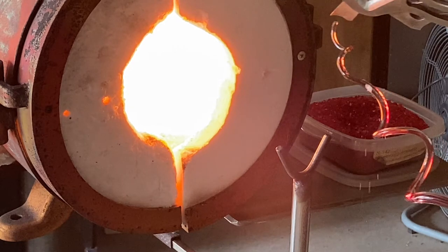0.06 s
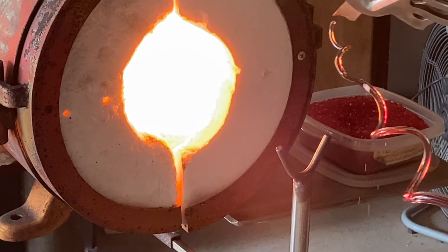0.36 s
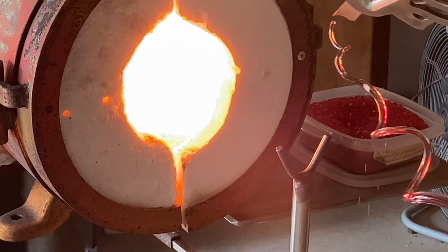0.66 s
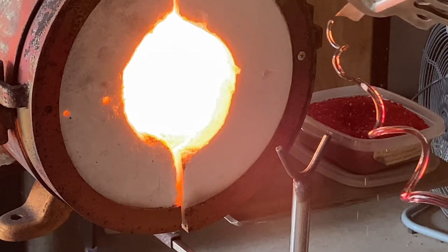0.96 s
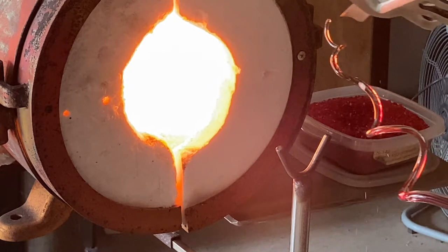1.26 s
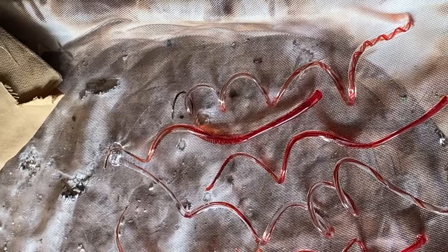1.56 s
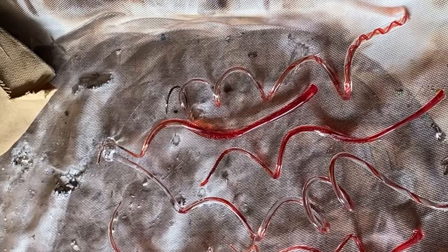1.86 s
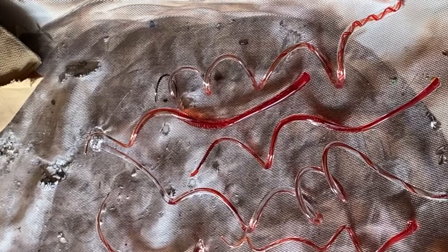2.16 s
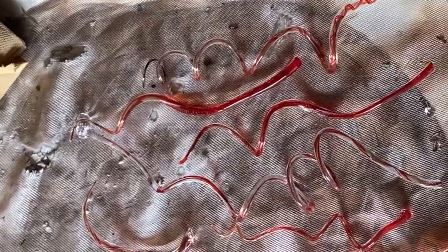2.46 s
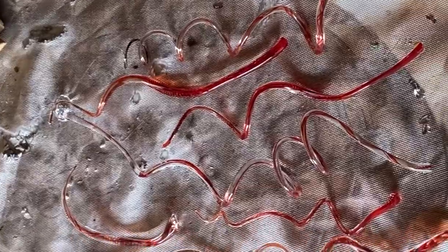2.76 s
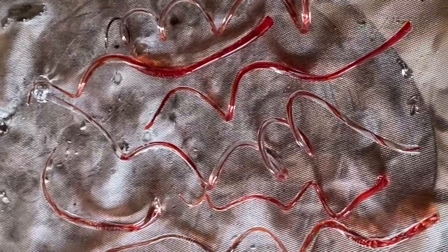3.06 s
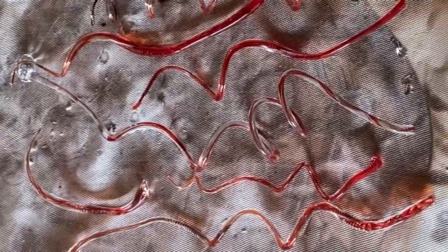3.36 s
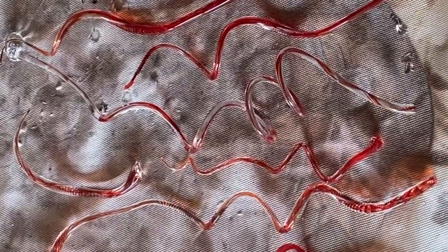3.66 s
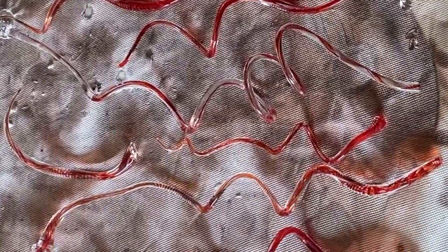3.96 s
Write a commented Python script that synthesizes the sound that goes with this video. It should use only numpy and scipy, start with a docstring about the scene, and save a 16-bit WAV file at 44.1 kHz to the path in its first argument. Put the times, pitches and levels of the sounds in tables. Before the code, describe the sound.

A glass furnace roars low, then gives way to steady rushing air and humming fans.

```python
"""Glass furnace and workshop

At the open port of a glass furnace the flame roars: a dull, fluttering rumble with a few ringing
resonances. After a cut we stand in the workshop, in a fuller, steady noise: rushing air, and the hum
of what are probably two fans, one near and one farther off, turning at slightly different speeds."""
import sys
import numpy as np
from scipy import signal
from scipy.fft import rfft, irfft
from scipy.io import wavfile

SR = 44100
rng = np.random.default_rng(int(sys.argv[2]) if len(sys.argv) > 2 else 0)


def pcm_store(signal):
    """Save signal as 16-bit PCM."""
    levels = np.round(np.clip(np.atleast_2d(signal), -1, 1) * 32767)
    wavfile.write(sys.argv[1], SR, levels.astype(np.int16).T)


N = 176400
TIME = np.arange(N) / SR
HZ = np.maximum(np.arange(N // 2 + 1) * SR / N, 1)

# The flame's roar at the port. Each row: frequency in Hz, noise density in dB.
ROAR_SPECTRUM = [(10, -46.5), (18, -44.5), (35, -45.5), (55, -49), (85, -57), (135, -56.5), (170, -63.5),
                 (210, -66.5), (255, -67.5), (290, -72.5), (500, -77.5), (640, -77), (750, -80),
                 (880, -81.5), (980, -78.5), (1100, -83), (1280, -81.5), (1420, -86)]
# The roar across the microphones. Each row: frequency in Hz, likeness 0-1, left phase lead in radians.
ROAR_IMAGE = [(29.6, 1, 0.28), (75, .78, 0.18), (125, 0.8, 0.9), (189, .98, .1), (300, .999, 0.0064)]
# Resonances of the furnace chamber. Each row: pitch in Hz, half width in Hz, rms level in dB.
CHAMBER_RESONANCES = [(130.6, 6.1, -46.5), (312.2, 7, -57.5), (546.5, 6, -62), (803.5, 9, -56.5)]
# Swell of the deepest rumble. Each row: time in seconds, gain in dB.
RUMBLE_SWELL = [(0, 4), (.25, 1), (.41, 4.5), (.55, 2), (.9, -3.5), (1.2, -2.5), (1.32, 2), (1.42, 8),
                (1.47, 0)]
# Puffs of the flame. Each row: time of the peak in seconds, lift in dB.
FLAME_PUFFS = [(.665, 5.5), (.77, 4.5), (.838, 4.8), (1.018, 3.5), (1.145, 5), (1.305, 5.5), (1.345, 4)]

# Rushing air in the workshop. Each row: frequency in Hz, noise density in dB.
AIR_SPECTRUM = [(20, -86), (32, -76), (45, -62.5), (75, -61), (113, -54.8), (155, -57.5), (172, -61.5),
                (215, -64.5), (268, -62), (310, -67), (400, -66.5), (530, -68.5), (630, -70), (720, -70.5),
                (790, -70.5), (885, -72), (980, -76.5), (1150, -77), (1650, -80), (2000, -78.5),
                (2800, -81.5), (3700, -87.5), (5000, -87), (6000, -89.5), (7200, -90), (8600, -96),
                (10500, -100), (12500, -100.8), (15000, -107)]
# Hollow resonances, probably of ducts. Each row: pitch in Hz, half width in Hz, lift in dB.
DUCT_RESONANCES = [(396, 5.2, 3), (531, 16, 3.5), (599, 4.6, 2), (783, 10, 2.5), (842, 11, 3),
                   (884, 13, 3.5), (1053, 12, 2.5), (1954, 60, 1), (5008, 50, 1)]
# The air across the microphones. Each row: frequency in Hz, likeness 0-1, left phase lead in radians,
# left minus right in dB.
AIR_IMAGE = [(150, 1, 0.0, 0.0), (352, 0.97, -0.15, -3), (605, 0.44, 0.06, -3.5), (790, 0.65, 0.0, -3),
             (1140, 0.3, 0.4, -1.4), (1900, 0.75, -0.1, -0.5), (3000, .65, -.44, -0.7),
             (4070, 0.4, -1.1, .4), (4880, 0.77, 0, .8), (5980, 0.67, -1.67, 0.5), (7460, 1, -3.05, -0.9),
             (8890, 1, -3, -1.95), (9300, 0.52, -4, -0.5), (12260, 0.94, -6.5, 0)]
# The near fan. Each row: multiple of the blade rate, rms level in dB.
NEAR_FAN_PARTIALS = [(1, -44), (2, -39), (3, -54), (4, -57.5)]
# The far fan. Each row: multiple of the blade rate, rms level in dB.
FAR_FAN_PARTIALS = [(2, -46), (3, -49.5), (5, -56.5)]
# Other machines in the room. Each row: pitch in Hz, rms level in dB.
MACHINE_HUMS = [(53.7, -46.5), (717.5, -55)]


def furnace(top_hz=1460, spread_from_hz=528, left_lag_s=0.0031):
    """At the port: the flame rings the chamber. The upper roar lags on the left, so it sounds wide."""
    roar = stereo_noise(ROAR_SPECTRUM, *over_hz(ROAR_IMAGE), balance_db=np.zeros_like(HZ))
    roar += sum(ringing_noise(*resonance) for resonance in CHAMBER_RESONANCES)
    left, right = rfft(flame_motion(roar)) / np.sqrt(1 + (HZ / top_hz) ** 120)
    lag = np.exp(-2j * np.pi * left_lag_s * np.maximum(HZ - spread_from_hz, 0))
    return irfft(np.array([left * lag, right]), N)


def flame_motion(roar, puff_half_s=0.02, between_puffs_db=-0.94, flutter_db=0.74):
    """The deepest rumble swells and sinks, puffs of flame lift the low body, and the rest flutters."""
    deep = low_part(roar, below_hz=33)
    body = low_part(roar - deep, below_hz=260)
    upper = roar - deep - body
    swell = from_db(np.interp(TIME, *np.transpose(RUMBLE_SWELL)))
    puffs_db = sum(db * np.exp(-((TIME - peak_s) / puff_half_s) ** 2) for peak_s, db in FLAME_PUFFS)
    flutter = from_db(flutter_db * drift(rate_hz=20))
    return deep * swell + body * from_db(between_puffs_db + puffs_db) + upper * flutter


def rushing_air(flutter_db=0.32):
    """Air all around the microphones: a smooth rush, coloured by hollow resonances."""
    air = stereo_noise(AIR_SPECTRUM, *over_hz(AIR_IMAGE))
    air *= from_db(flutter_db * drift(rate_hz=29))
    lift_db = sum(db / (1 + ((HZ - hz) / half_width) ** 2) for hz, half_width, db in DUCT_RESONANCES)
    return irfft(rfft(air) * from_db(lift_db), N)


def fans(near_blade_hz=91.2, far_blade_hz=94.6):
    """Two fans, near and far, beat against each other because their blade rates differ slightly."""
    return rotor_hum(near_blade_hz, NEAR_FAN_PARTIALS) + rotor_hum(far_blade_hz, FAR_FAN_PARTIALS)


def machines():
    """Other machines hum behind the fans, one tone each."""
    return sum(rotor_hum(hz, [(1, db)]) for hz, db in MACHINE_HUMS)


def rotor_hum(hz, partials, speed_wander=0.003, waver_db=1.6):
    """A rotor whose speed wanders a little; each partial wavers on its own."""
    cycles = np.cumsum(hz * (1 + speed_wander * drift(rate_hz=1.44))) / SR
    hum = np.zeros(N)
    for multiple, db in partials:
        waver = from_db(waver_db * drift(rate_hz=4.5))
        tone = np.sin(2 * np.pi * (multiple * cycles + rng.random()))
        hum += from_db(db) * rms_one(waver * tone)
    return hum


def whistle():
    """A faint, airy whistle, opposite in polarity at the two microphones."""
    return ringing_noise(hz=8100, half_width_hz=160, db=-64) * np.array([[1], [-1]])


def ringing_noise(hz, half_width_hz, db):
    """Turbulence heard through one narrow resonance."""
    resonance = 1 / (1 + ((HZ - hz) / half_width_hz) ** 2)
    return from_db(db) * rms_one(irfft(rfft(rng.standard_normal(N)) * resonance, N))


def stereo_noise(spectrum, likeness, phase, balance_db):
    """Noise of a given density, partly shared between the left and right microphones."""
    density_db, = over_hz(spectrum)
    shared, left, right = rfft(rng.standard_normal((3, N)))
    pair = np.sqrt(likeness) * shared + np.sqrt(1 - likeness) * np.array([left, right])
    pan = np.array([from_db(balance_db / 2) * np.exp(1j * phase), from_db(-balance_db / 2)])
    return irfft(pair * pan * from_db(density_db) * np.sqrt(SR / 2), N)


def drift(rate_hz):
    """Random wander with an rms of 1, mostly slower than the given rate."""
    return rms_one(irfft(rfft(rng.standard_normal(N)) / (1 + (HZ / rate_hz) ** 2), N))


def low_part(sound, below_hz):
    """The low end of a sound, with its phase unchanged."""
    return irfft(rfft(sound) / (1 + (HZ / below_hz) ** 4), N)


def over_hz(rows):
    """Each column of a table, joined by straight lines over log frequency."""
    hz, *columns = np.transpose(rows)
    return [np.interp(np.log(HZ), np.log(hz), column) for column in columns]


def from_db(db):
    """Decibels to gain."""
    return 10 ** (np.asarray(db) / 20)


def rms_one(x):
    """Scale to an rms of 1."""
    return x / np.sqrt(np.mean(x ** 2) + 1e-20)


def scene(cut_s=1.478, fade_s=0.012):
    """Two microphone positions: at the furnace port, then a quick cut to the workshop."""
    port = furnace()
    workshop = rushing_air() + whistle() + fans() + machines()
    crossfade = np.clip((TIME - cut_s) / fade_s + 0.5, 0, 1)
    return (1 - crossfade) * port + crossfade * workshop


def record(dry, cutoff_hz=15400):
    """The highest treble is cut steeply."""
    return signal.sosfilt(signal.ellip(10, 0.1, 80, cutoff_hz, fs=SR, output="sos"), dry)


dry = scene()
out = record(dry)
pcm_store(out)
```